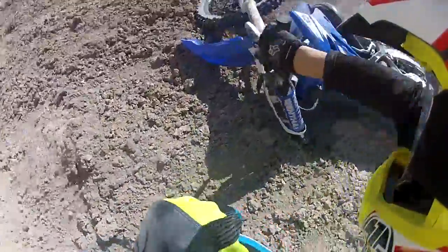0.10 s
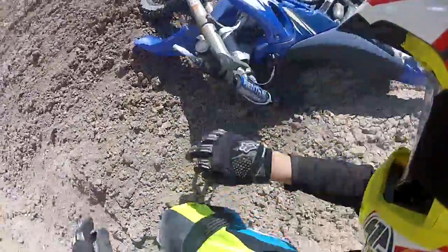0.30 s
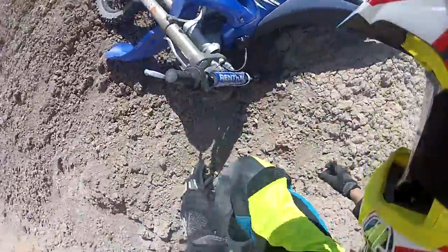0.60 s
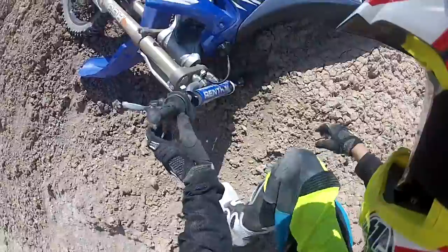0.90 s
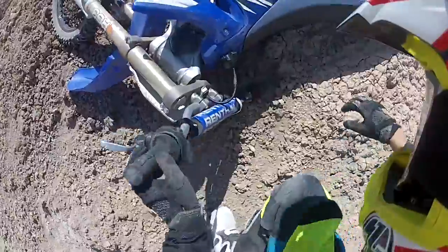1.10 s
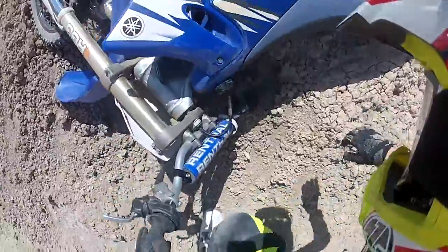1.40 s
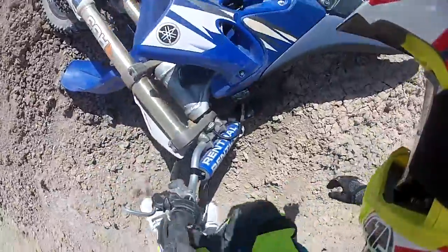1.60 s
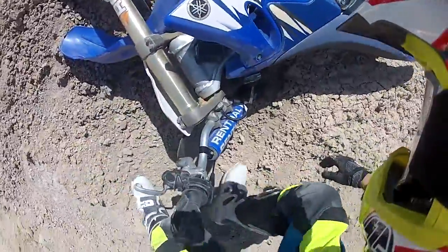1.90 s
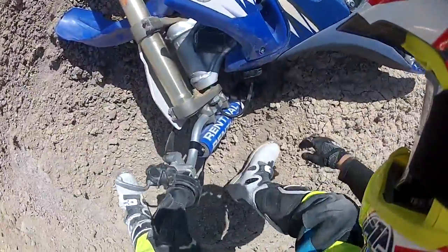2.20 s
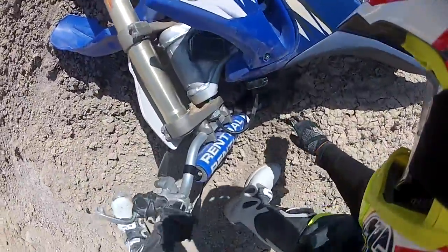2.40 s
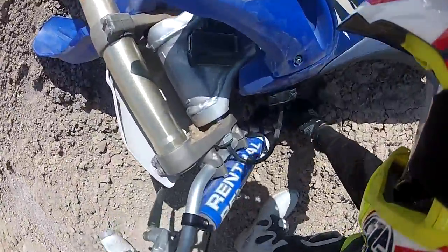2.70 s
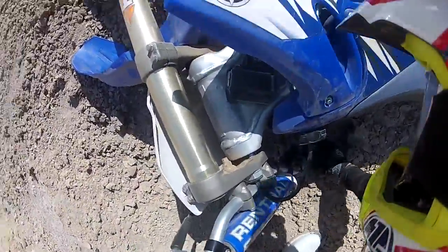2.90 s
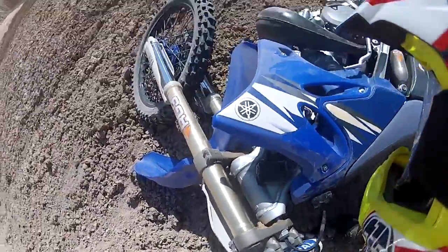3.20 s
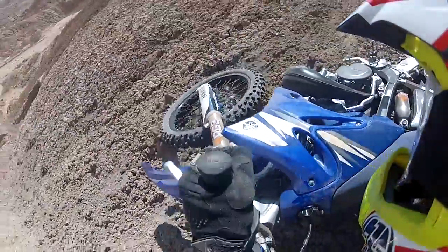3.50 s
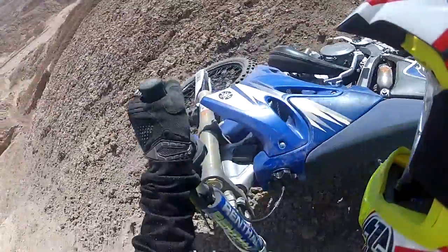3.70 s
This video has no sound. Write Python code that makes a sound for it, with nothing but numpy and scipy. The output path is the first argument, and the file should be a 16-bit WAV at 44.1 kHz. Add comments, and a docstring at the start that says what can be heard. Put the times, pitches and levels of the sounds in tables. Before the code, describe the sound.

Close, dry outdoor helmet microphone: muffled knocks on the camera housing, low wind buffets, faint grit under boots and tyres, one short creak, then a flurry of stone clicks, stronger grinding and faint thin squeaks.

```python
"""A rider heaves a fallen dirt bike up on a loose, rocky slope, heard from a camera on the helmet.
First come dull gear knocks on the camera's housing, a scuff and a pebble; then wind buffets the microphone.
Gear rubs and grit grinds under boots and tyres all along; near 3 s the gear catches and creaks once.
Pebbles then click thickly, the grinding swells, and something squeaks thinly as the bike comes up.
Filtered noise makes the wind, random grains the rubbing and grit, short tones the knocks and squeaks."""
import sys
import numpy as np
from scipy import signal
from scipy.fft import rfft, irfft, next_fast_len
from scipy.io import wavfile
from scipy.ndimage import uniform_filter1d, map_coordinates

SR = 44100
rng = np.random.default_rng(int(sys.argv[2]) if len(sys.argv) > 2 else 0)


def unload_audio(sound):
    """Save the sound as a 16-bit wav file, at the path given as the first command line argument."""
    columns = np.transpose(np.atleast_2d(sound))
    # keep every value between -1 and 1, then stretch to whole-number steps
    steps = np.round(np.clip(columns, -1, 1) * 32767)
    wavfile.write(sys.argv[1], SR, steps.astype(np.int16))


N = 167580
T = np.arange(N) / SR  # time of each sample, s

# Muffled tone of anything rubbing on the housing: frequency_hz, gain_db
HOUSING_COLOUR = [(30, -22), (110, -20), (190, 2), (320, 1), (450, 1.5), (610, 0.5), (720, -7.5),
                  (850, -19), (1100, -17.5), (2500, -46)]
# Tone of grit crushed close by: frequency_hz, gain_db
GRIT_COLOUR = [(200, -20), (600, 2), (850, 3.5), (1080, -2.5), (1350, 1.5), (1650, -.5), (2100, 2),
               (2750, 1), (3100, 0.5), (3450, -7), (4000, -6.5), (4400, -9.5), (5200, -11), (5650, -19.5),
               (6000, -32), (7500, -32), (15000, -20)]


def amp(db):
    """Decibels to gain."""
    return 10 ** (np.asarray(db) / 20)


def unit(x):
    """Scale to rms 1."""
    return x / np.sqrt(np.mean(x ** 2) + 1e-20)


def curve(rows):
    """Straight lines through (s, value) rows, one value per sample."""
    return np.interp(T, *np.transpose(rows))


def wobble(rate):
    """A smooth random curve, rate knots a second."""
    return map_coordinates(rng.standard_normal(4096), [T * rate], mode="mirror")


def filtered(x, response):
    """Multiply the spectrum of x by a response of frequency in Hz."""
    size = next_fast_len(N + 8192)  # padded, so the end does not wrap onto the start
    spectrum = rfft(x, size) * response(np.fft.rfftfreq(size, 1 / SR))
    return irfft(spectrum, size)[:N]


def coloured(x, points):
    """Filter x through (Hz, dB) points joined on a log frequency axis."""
    f, db = np.transpose(points)
    return filtered(x, lambda hz: amp(np.interp(np.log(hz + 1), np.log(f + 1), db)))


def grains(per_s, spread_db):
    """Tiny impacts at random times: many weak, a few strong."""
    hit = rng.random(N) < per_s / SR
    size = np.minimum(rng.exponential(size=N), 4)
    sign = np.sign(rng.standard_normal(N))
    return hit * sign * amp(spread_db * size)


def wind():
    """Eddies on the microphone: a low rumble that comes in lumps within each gust."""
    # Gusts at the microphone: start_s, level_db (before trim_db)
    gusts = [(0.0, -50), (0.05, -49), (0.41, -55.5), (0.5, -46), (0.51, -36.5), (0.6, -25.5), (0.64, -35.5),
             (0.68, -29), (0.74, -37), (0.76, -20.5), (0.91, -29.5), (0.94, -22.5), (1.0, -34), (1.05, -25),
             (1.07, -42), (1.13, -36), (1.17, -53.5), (1.32, -54.5), (1.38, -38), (1.48, -45),
             (1.52, -36.5), (1.59, -33), (1.69, -40.5), (1.76, -31.5), (1.82, -37), (1.89, -30.5),
             (2.16, -38), (2.18, -29.5), (2.2, -42.5), (2.25, -33.5), (2.29, -52), (2.37, -33),
             (2.43, -29.5), (2.53, -39), (2.56, -29), (2.66, -49.5), (2.76, -50.5), (2.79, -35.5),
             (3.05, -44), (3.11, -33.5), (3.14, -40), (3.19, -29.5), (3.28, -39.5), (3.72, -52),
             (3.77, -59), (3.8, -42)]
    # Rumble of the eddies: frequency_hz, gain_db
    rumble_colour = [(12, -39), (22, -5), (38, 2), (58, -1.5), (82, 1), (110, -3.5), (150, -6),
                     (210, -12.5), (300, -19.5), (450, -32.5), (800, -55), (2000, -83)]
    trim_db, buffet_db, buffet_knots_per_s = -0.5, 1.5, 26
    air = unit(coloured(rng.standard_normal(N), rumble_colour))
    # even out the noise's own swells over 59 ms, then add the lumps
    air /= np.sqrt(np.abs(uniform_filter1d(air ** 2, size=2600)) + 1e-6)
    lumpy = unit(air * amp(buffet_db * wobble(buffet_knots_per_s)))
    return lumpy * amp(curve(gusts) + trim_db)


def rubbing():
    """Small slips of the gear, muffled by the housing."""
    # Rubbing of the gear against the camera: start_s, level_db (before trim_db)
    rub_levels = [(0, -47.5), (.06, -55), (.14, -50), (.185, -57), (.23, -48), (.33, -52.5), (.46, -48.5),
                  (.51, -51), (.6, -49.5), (.71, -58), (.79, -52.5), (.92, -50), (1.0, -57.5), (1.07, -53),
                  (1.18, -51), (1.27, -55.5), (1.37, -60), (1.48, -53), (1.57, -62), (1.72, -62),
                  (1.95, -53), (2.14, -63), (2.29, -62), (2.38, -46.5), (2.45, -55), (2.63, -48),
                  (2.82, -55), (2.91, -47.5), (2.98, -48), (3.11, -46), (3.16, -50.5), (3.36, -51),
                  (3.43, -46.5), (3.57, -51.5), (3.65, -48), (3.8, -52)]
    trim_db = 4
    slips = unit(coloured(grains(per_s=900, spread_db=2.5), HOUSING_COLOUR))
    return slips * amp(curve(rub_levels) + trim_db)


def judder():
    """The gear sticks and slips at an uneven rate: one short dull creak in the housing."""
    centre_s, width_s, level_db = 2.985, 0.025, -36  # width is the standard deviation of the swell
    slip_hz, unevenness = 290.8, 0.14
    slip_rate = slip_hz * np.exp(unevenness * wobble(150))
    slip_count = np.floor(np.cumsum(slip_rate) / SR)
    slips = np.diff(slip_count, prepend=0)  # one impulse per slip
    creak = unit(coloured(slips - slips.mean(), HOUSING_COLOUR))
    swell = np.exp(-0.5 * ((T - centre_s) / width_s) ** 2)
    return creak * amp(level_db) * swell


def knocks():
    """Soft blows on the damped housing: each tone is gone within three cycles of its peak."""
    # Dull knocks and deep bumps: peak_s, peak_db, pitch_hz
    blows = [(.1465, -38, 460), (0.1558, -27.5, 358), (0.2099, -23, 500), (0.221, -36, 503),
             (.252, -32, 400), (.2764, -28, 484), (.284, -37, 540), (0.3112, -34, 564), (0.3562, -27, 490),
             (0.4399, -23.5, 417), (0.4514, -33, 334), (0.479, -25.5, 530), (.614, -31, 325),
             (.769, -28.5, 322), (0.8072, -27, 495), (.822, -19, 134), (.9388, -29, 576), (0.983, -40, 420),
             (1.018, -33, 468), (1.0966, -32.5, 493), (1.5061, -35, 424), (1.6245, -20.5, 510),
             (1.6352, -28.5, 520), (1.648, -31, 420), (1.9933, -34.5, 557), (2.3169, -34, 490),
             (2.3545, -34, 450), (2.3857, -33, 460), (2.438, -29, 84), (2.5955, -40, 587),
             (3.0023, -28.5, 530), (3.1219, -36, 465), (3.197, -22.5, 67), (3.4156, -32, 483),
             (3.5383, -32, 396), (3.6128, -33, 610), (3.6576, -32.5, 580)]
    rise_cycles, fall_cycles = 0.44, 0.74  # Gaussian widths before and after the peak
    out = np.zeros(N)
    for s, db, hz in blows:
        near = np.abs(T - s) < 0.06
        cycles = (T[near] - s) * hz
        width = np.where(cycles < 0, rise_cycles, fall_cycles)
        envelope = np.exp(-0.5 * (cycles / width) ** 2)
        out[near] += amp(db) * np.cos(2 * np.pi * cycles) * envelope
    return out


def patchy(x, depth_db):
    """Uneven grinding: random gain patches some 500 Hz by 25 ms."""
    spectrogram = signal.stft(x, nperseg=256)[2]
    field = rng.standard_normal(spectrogram.shape)
    field = uniform_filter1d(field, size=3, axis=0)  # smooth across frequency
    field = uniform_filter1d(field, size=8, axis=1)  # smooth across time
    shaped = spectrogram * amp(depth_db * unit(field))
    return unit(signal.istft(shaped, nperseg=256)[1][:N])


def grit():
    """Coarse grains crackle under boots and tyres over the hiss of sliding dust."""
    # Grinding underfoot: start_s, level_db (before the coarse and dust gains)
    grind_levels = [(0, -61), (.2, -59.5), (.45, -59.5), (.58, -58.5), (.75, -62), (.9, -61.5), (1.02, -63),
                    (1.17, -58), (1.24, -64), (1.29, -57), (1.39, -64), (1.52, -61.5), (1.6, -60.5),
                    (1.72, -65.5), (1.8, -63.5), (1.94, -65.5), (2.01, -62.5), (2.13, -65.5), (2.28, -66),
                    (2.32, -59.5), (2.39, -57.5), (2.48, -61.5), (2.6, -59.5), (2.76, -60), (2.87, -63),
                    (2.94, -57.5), (3.0, -58), (3.05, -60.5), (3.12, -58), (3.3, -62.5), (3.38, -53),
                    (3.44, -51.5), (3.49, -53), (3.53, -53.5), (3.59, -59), (3.65, -53.5), (3.73, -61.5),
                    (3.8, -56)]
    coarse_db, dust_db = -3.5, -1.5
    wobble_db, patch_db = 1.5, 1.8
    crackle = grains(per_s=800, spread_db=3) * amp(wobble_db * wobble(48))
    coarse = patchy(unit(coloured(crackle, GRIT_COLOUR)), patch_db)
    dust = patchy(unit(coloured(rng.standard_normal(N), GRIT_COLOUR)), patch_db)
    return amp(curve(grind_levels)) * (amp(coarse_db) * coarse + amp(dust_db) * dust)


def scuffs():
    """Each slide is a dense burst of grains: crunching grit, a dull scrape and sharp stone edges."""
    # Slides of a boot or tyre: start_s, length_s, crunch_db, scrape_db, edge_db (before sag and fades)
    slides = [(0.226, 0.023, -47.5, -42, -41), (.476, 0.0058, -45.5, -55, -72), (0.565, .01, -50, -60, -73),
              (0.866, 0.0065, -49, -62, -75), (0.929, 0.021, -54.5, -41, -70),
              (1.278, 0.024, -58.5, -57, -82), (1.992, .04, -60.5, -56.5, -78),
              (1.606, 0.022, -58, -44, -79), (1.622, 0.025, -48.5, -34, -72),
              (1.643, 0.034, -58.5, -43.5, -82), (2.938, .04, -58, -45, -74),
              (2.976, 0.036, -57, -44.5, -78), (3.381, 0.021, -48, -55, -72),
              (3.419, 0.047, -49, -40.5, -68), (3.501, .022, -54, -47, -57), (3.629, 0.0082, -42, -44, -68),
              (3.656, 0.021, -51, -47, -61)]
    # Tone of sharp stone edges: frequency_hz, gain_db
    edge_colour = [(400, -23), (1000, -1), (1350, 1), (1750, -11), (2200, -0.5), (2700, -1.5), (3150, 5.5),
                   (3600, -13), (4400, -22), (5200, -6.5), (6800, -18), (7600, -32), (9000, -8.5),
                   (11000, -27), (13500, -25), (15200, -6)]
    rise_s, fall_s, sag_db = 0.0013, 0.0047, 6
    colours = (GRIT_COLOUR, HOUSING_COLOUR, edge_colour)
    layers = np.array([unit(coloured(grains(per_s=1400, spread_db=3.5), c)) for c in colours])
    out = np.zeros(N)
    for s, length, *levels_db in slides:
        rise = np.clip((T - s) / rise_s, 0, 1)
        fall = np.exp(-np.maximum(T - s - length + fall_s, 0) / fall_s)
        sag = amp(-sag_db * np.clip((T - s) / length, 0, 1))
        out += rise * fall * sag * (amp(levels_db) @ layers)
    return out


def pebbles():
    """Stone on stone: noise bursts for a bright tick and a lower clack, with almost no ring."""
    # Single clicks: start_s, tick_db, clack_db (noise level at onset, before the stone's colour)
    clicks = [(.2318, -30.5, -48), (.6335, -46, -55), (1.171, -50, -58), (1.2795, -47, -50),
              (1.8656, -45.5, -29), (1.8695, -60, -45), (1.889, -54, -42.5), (2.073, -51, -45.5),
              (2.594, -59, -53), (3.185, -40, -54), (3.196, -43, -40), (3.207, -41, -51), (3.219, -39, -56),
              (3.239, -40, -47), (3.272, -37, -54), (3.3225, -37.5, -49), (3.355, -36.5, -40),
              (3.3795, -37, -44), (3.3919, -35, -43), (3.428, -48, -40), (3.519, -45, -34),
              (3.6355, -46, -29), (3.657, -37, -45), (3.666, -41, -52), (3.67, -34, -52), (3.790, -44, -47)]
    # Tone of the bright tick: frequency_hz, gain_db
    tick_colour = [(400, -20), (1500, 0), (2600, 1.5), (3300, -5), (4100, -6), (4700, -12), (5400, -1),
                   (6100, -21.5), (6800, -17), (7800, -15), (9500, -18), (11000, -18), (15000, -15)]
    # Tone of the lower clack: frequency_hz, gain_db
    clack_colour = [(200, -5), (650, 12), (900, 1), (1200, 7), (1900, -1), (2250, -10), (2600, -9.5),
                    (3800, -0.5), (4400, -24), (5200, -14), (6000, -26), (7000, -26), (8300, -20),
                    (9500, -30), (15000, -25)]
    t60_s = 0.013  # time to decay by 60 dB
    out = np.zeros((2, N + SR))  # spare second for clicks near the end
    t = np.arange(SR // 20) / SR
    decay = amp(-60 * t / t60_s)
    for s, *levels_db in clicks:
        start = round(s * SR)
        bursts = decay * rng.standard_normal((2, len(t)))
        out[:, start:start + len(t)] += amp(levels_db)[:, None] * bursts
    tick, clack = out[:, :N]
    return coloured(tick, tick_colour) + coloured(clack, clack_colour)


def squeaks():
    """A rubbing part of the bike sings briefly, rising in pitch."""
    # Thin squeaks: start_s, length_s, level_db (rms at mid-squeak, before flicker),
    # start_hz, end_hz (before jitter)
    cries = [(3.44, 0.024, -60, 2950, 3650), (3.606, 0.049, -51.5, 2930, 3170),
             (3.654, .022, -52, 2537, 2650), (3.672, .028, -57, 3290, 3490),
             (3.698, 0.087, -67, 3510, 3960)]
    jitter_hz, flicker_db = 28, 1
    out = np.zeros(N)
    jitter = jitter_hz * wobble(500)
    for s, length, db, start_hz, end_hz in cries:
        progress = np.clip((T - s) / length, 0, 1)
        hz = start_hz + (end_hz - start_hz) * progress + jitter
        arch = np.sqrt(2 * np.abs(np.sin(np.pi * progress)))
        out += amp(db) * arch * np.sin(2 * np.pi * np.cumsum(hz) / SR)
    return out * amp(flicker_db * wobble(120))


def scene():
    """Open air, everything close and dry."""
    on_camera = wind() + rubbing() + judder() + knocks()
    on_slope = grit() + scuffs() + pebbles() + squeaks()
    return (on_camera + on_slope)[None]


def record(dry):
    """The camera holds its low band at a coarse rate, mirroring it into the treble; then its band limit."""
    hold_hz, mirror_db, top_hz = 12000, 0.5, 15400
    low = filtered(dry[0], lambda hz: hz < hold_hz / 2)
    images = 2 * low * np.cos(2 * np.pi * hold_hz * T)
    # the image fades towards the hold rate, where the lowest sounds land
    mirror = filtered(images, lambda hz: (hz - hold_hz) / np.maximum(hz, hold_hz / 2))
    return filtered(dry[0] + amp(mirror_db) * mirror, lambda hz: hz < top_hz)[None]


dry = scene()
out = record(dry)
unload_audio(out)
```